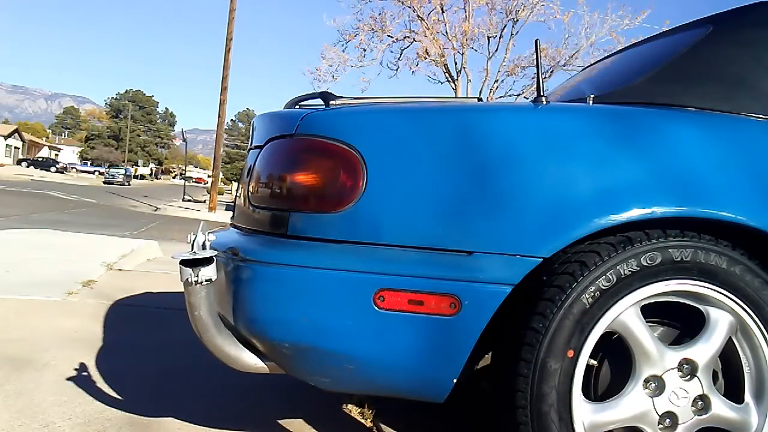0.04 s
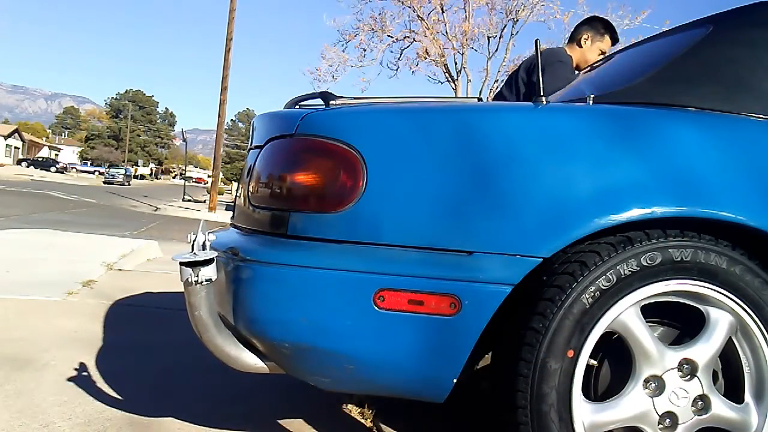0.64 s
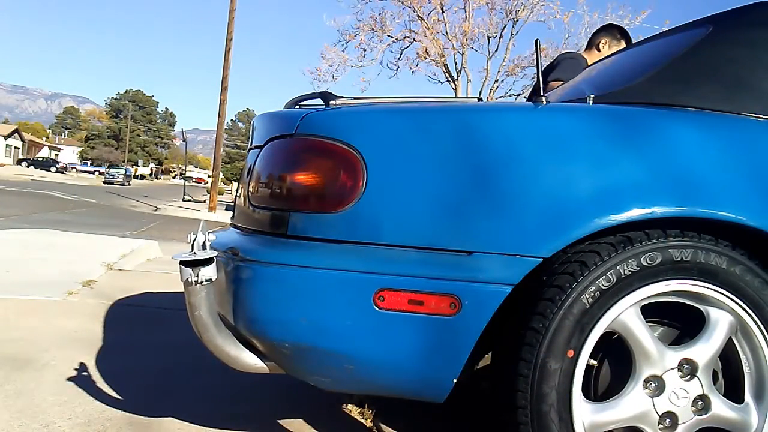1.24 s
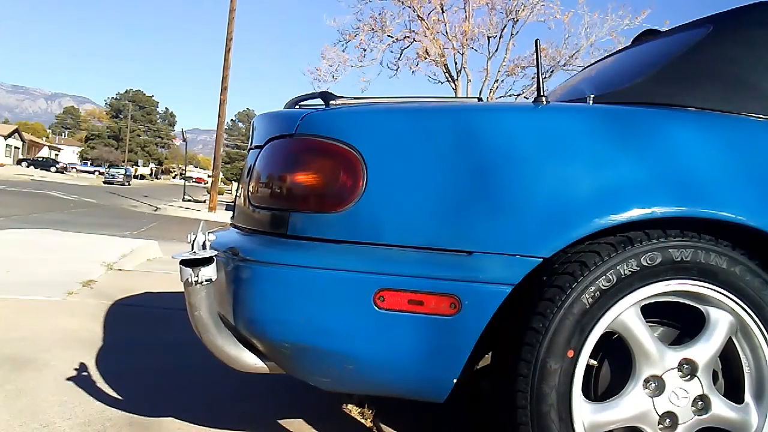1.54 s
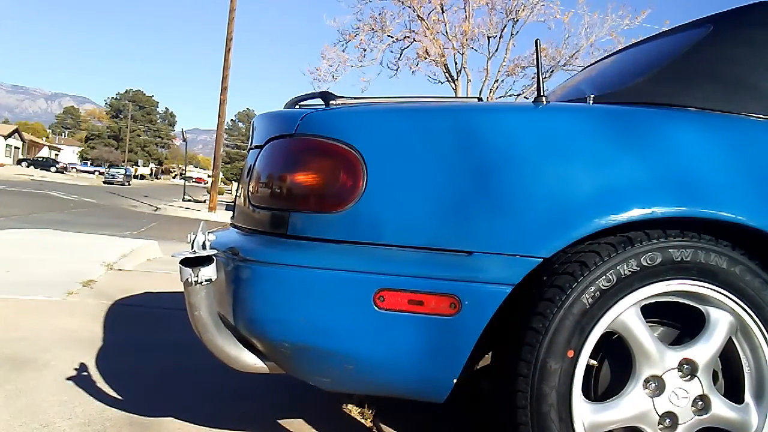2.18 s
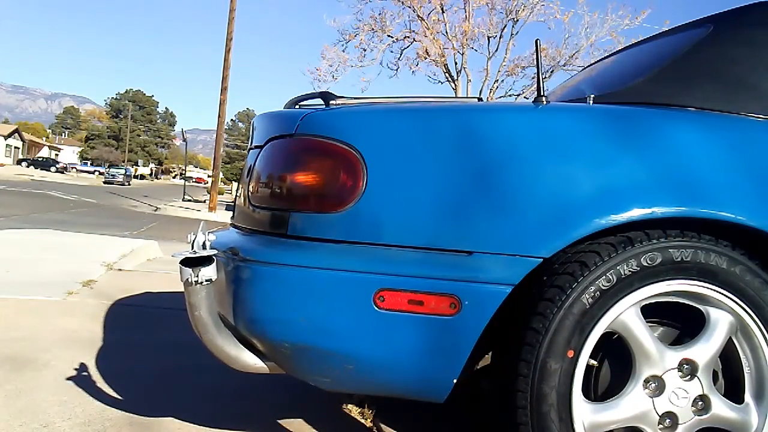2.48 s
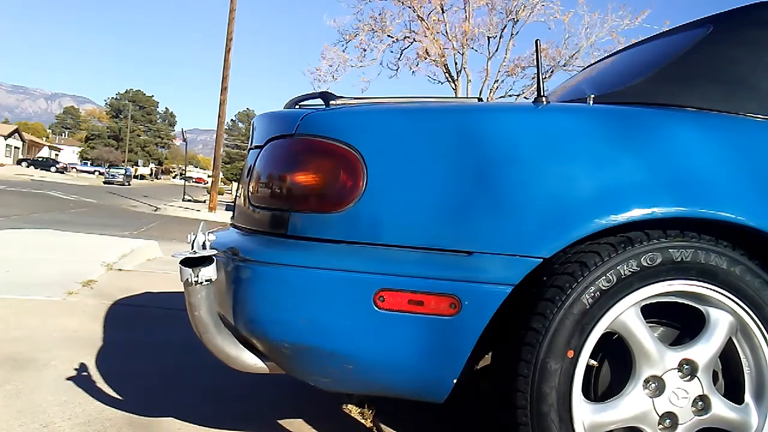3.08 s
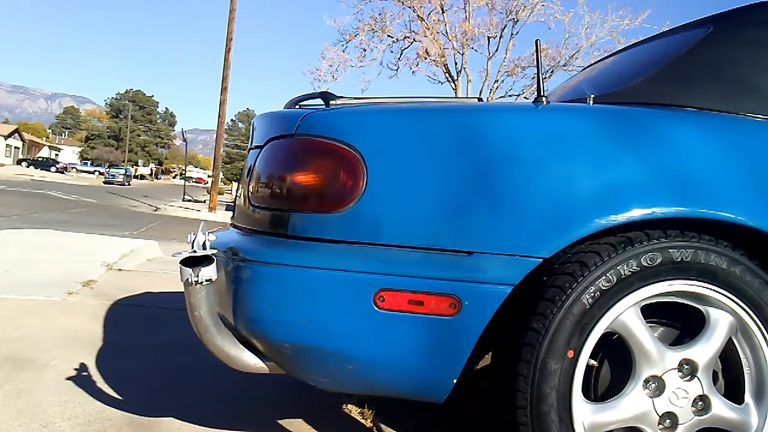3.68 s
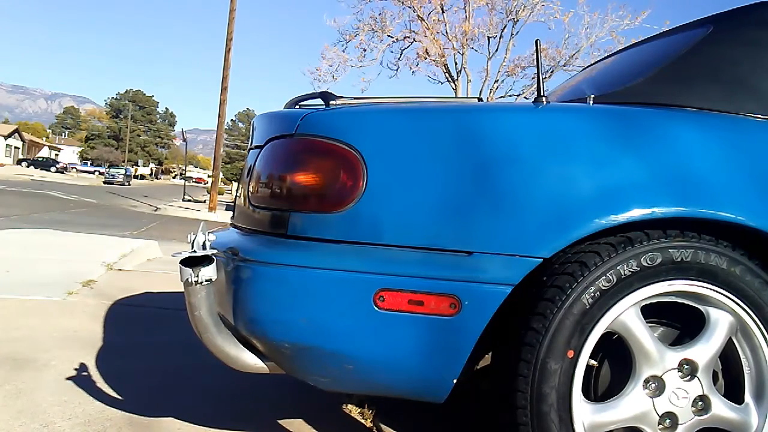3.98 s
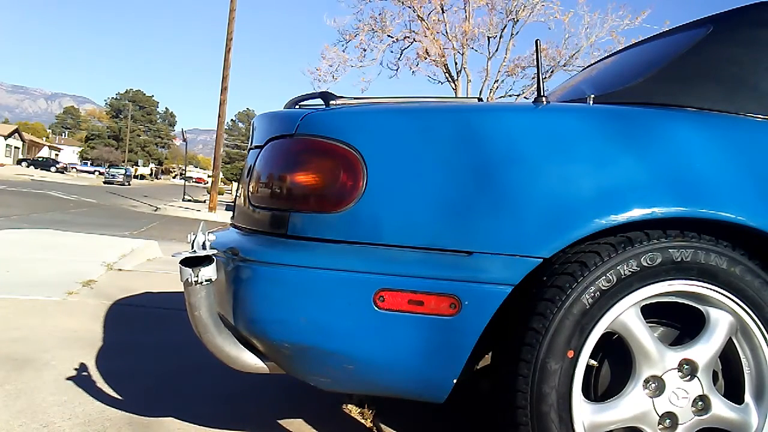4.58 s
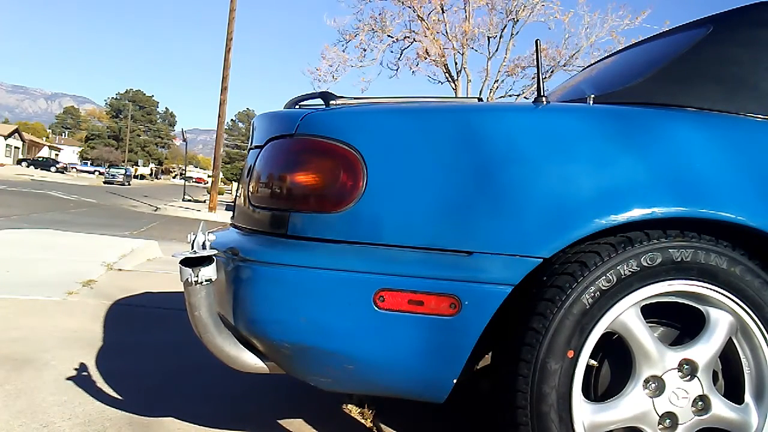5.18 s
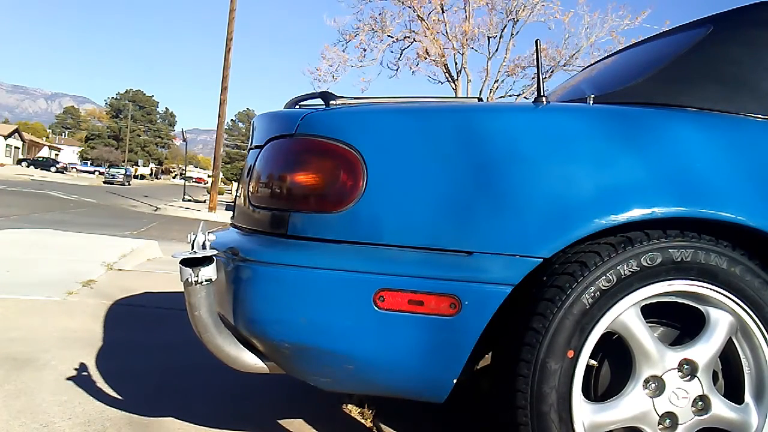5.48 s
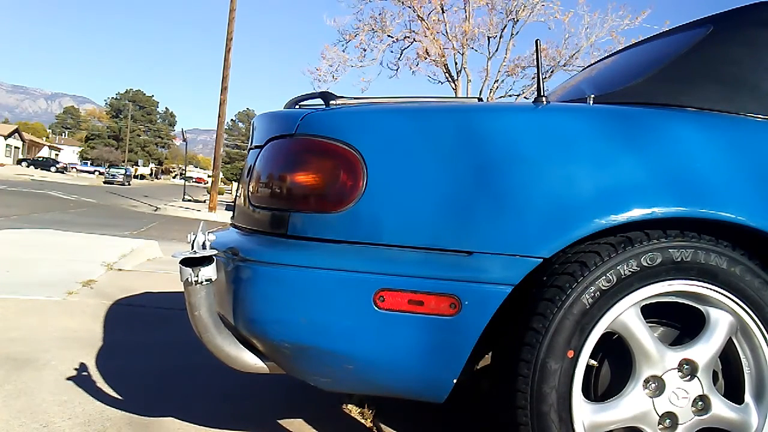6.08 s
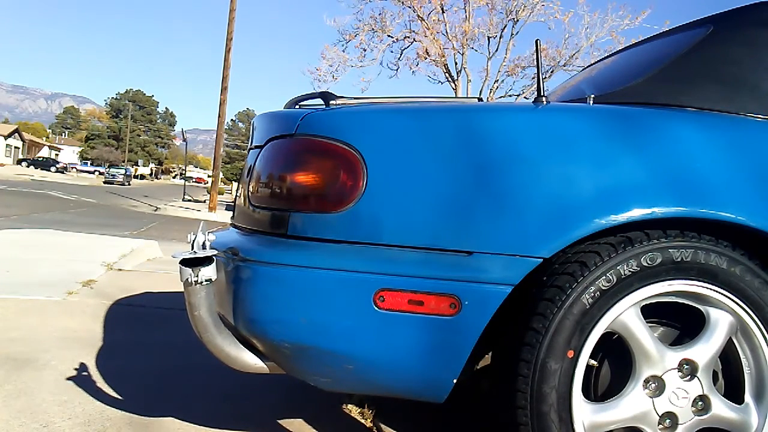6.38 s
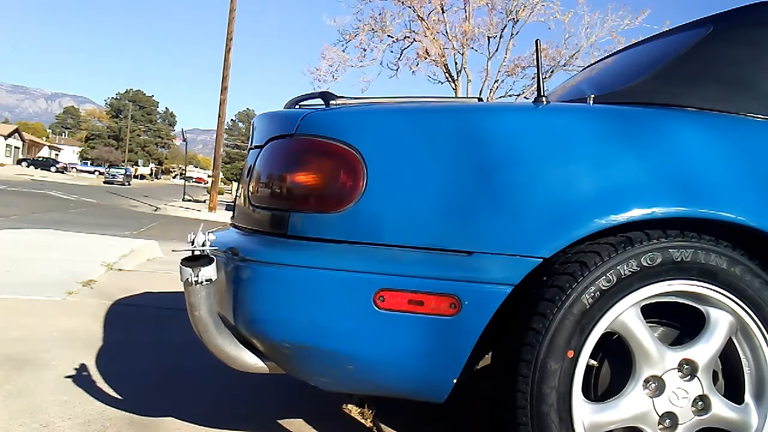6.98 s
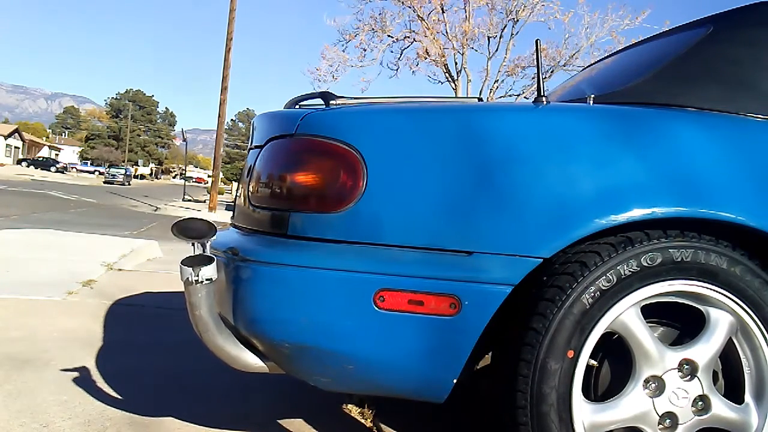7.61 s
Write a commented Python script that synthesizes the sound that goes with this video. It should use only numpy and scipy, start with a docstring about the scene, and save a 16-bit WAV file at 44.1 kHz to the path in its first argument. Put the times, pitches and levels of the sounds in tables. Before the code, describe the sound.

Close, throaty car engine idle with a door thud and light ticking, ending in three quick revs and a clanking exhaust cap.

```python
"""On a street, close by, a small four-cylinder car idles through an upturned pipe with a hinged metal cap.
Each firing sends out a pressure pulse (boom), excites standing waves (growl, puff) and sheds turbulence
(chuff, hiss). The idle settles, the driver shuts the door, the cap ticks on the rim, and the recorder
turns the sound down in steps. Then three stabs of throttle steepen the pulses into shocks that bark,
rasp and sizzle; the cap clanks between them."""
import sys
import numpy as np
from scipy import signal
from scipy.fft import rfft, irfft, next_fast_len
from scipy.io import wavfile
from scipy.ndimage import uniform_filter1d, minimum_filter1d

SR = 44100
rng = np.random.default_rng(int(sys.argv[2]) if len(sys.argv) > 2 else 0)


def materialize(psi):
    """Save the field psi as 16-bit PCM at rate SR to the path in sys.argv[1].

    A 1-D psi becomes a single channel; in a 2-D psi each row is a channel.
    """
    bounded = np.clip(np.atleast_2d(psi).T, -1, 1)
    quanta = np.round(bounded * 32767).astype(np.int16)
    wavfile.write(sys.argv[1], SR, quanta)


N = 346163
T = np.arange(N) / SR
SIZE = next_fast_len(N + SR // 2)
FREQS = np.arange(SIZE // 2 + 1) * SR / SIZE


def amp(db):
    """Amplitude ratio of a level in decibels."""
    return 10 ** (np.asarray(db) / 20)


def curve(points):
    """Linear interpolation of (t/s, value) points."""
    return np.interp(T, *np.transpose(points))


def noise():
    """Gaussian white noise."""
    return rng.standard_normal(N)


def scatter(spread_db, count, modes):
    """Log-normal excitation: for each mode, a random gain at each of count events."""
    return amp(spread_db * rng.standard_normal((count, len(modes))).T)


def shape(x, response):
    """Linear filtering: the spectrum times a frequency response."""
    return irfft(rfft(x, SIZE) * response, SIZE)[:N]


def colour(x, spectrum):
    """Spectral weighting through (f/Hz, level/dB) points."""
    hz, db = np.transpose(spectrum)
    return shape(x, amp(np.interp(np.log(FREQS + 1), np.log(hz), db)))


def ring(x, modes):
    """Modal superposition: damped resonators (f/Hz, bandwidth/Hz, gain/dB) in parallel."""
    return shape(x, sum(amp(db) * 1j * FREQS * w / (f * f - FREQS ** 2 + 1j * FREQS * w)
                        for f, w, db in modes))


def bent_ring(x, modes, scale):
    """Time warping: all resonant frequencies follow one moving factor."""
    clock = np.cumsum(scale) / SR
    grid = T * clock[-1] / T[-1]
    rung = ring(np.interp(grid, clock, x), [(f * scale.mean(), w, db) for f, w, db in modes])
    return np.interp(clock, grid, rung)


def cut(x, hz, kind, order=4):
    """Zero-phase Butterworth low- or high-pass."""
    ratio = (FREQS + 1) / hz
    return shape(x, (1 + ratio ** (2 * order if kind == "low" else -2 * order)) ** -.5)


def band(x, low_hz, high_hz, low_order=4, high_order=4):
    """Band-pass: two slopes in cascade."""
    return cut(cut(x, low_hz, "high", low_order), high_hz, "low", high_order)


def shelf(x, hz, db, order=4):
    """High shelf: the part above hz changes by db."""
    return x + (amp(db) - 1) * cut(x, hz, "high", order)


def steady(x, seconds=0.045):
    """Normalisation to unit running RMS, keeping each pulse's shape."""
    k = int(seconds * SR)
    return x / np.sqrt(np.abs(uniform_filter1d(uniform_filter1d(x * x, k), k)) + 1e-12)


def pulses(times, sizes):
    """Impulse train, each impulse shared between two samples."""
    at = np.clip(times * SR, 0, N - 2)
    i = at.astype(int)
    return np.bincount(i, sizes * (1 - at + i), N) + np.bincount(i + 1, sizes * (at - i), N)


def turbulence(kicks, rise_s, fall_s, rest, seconds=0.14):
    """Flow noise: it swells and decays after each kick, over a resting flow."""
    t = T[:SR // 10]
    flow = signal.oaconvolve(kicks, (1 - np.exp(-t / rise_s)) * np.exp(-t / fall_s))[:N]
    return (steady(flow, seconds) + rest) * noise()


# firing rate of the settling idle: t/s, f/Hz
IDLE_RATE = [(0, 53.03), (.25, 52.34), (.5, 50.1), (1, 48.52), (1.7, 47.05), (2.3, 46.55), (4, 46.56),
             (5, 47.08), (6, 47.37), (6.6, 47.15)]
# throttle stabs: opening t/s, shutting t/s, firing rate reached f/Hz, added rasp and sizzle level/dB
STABS = [(6.672, 7.031, 87.7, -1.5), (7.26, 7.457, 103.7, 0), (7.588, 7.735, 113, 1)]
def firing_rate(coast_hz_per_s=32):
    """Fundamental frequency: the idle, then a linear climb in each stab and a slow fall after it."""
    points = list(IDLE_RATE) + [(STABS[0][0], IDLE_RATE[-1][1])]
    next_opens = [row[0] for row in STABS[1:]] + [T[-1]]
    for (_, shuts, top_hz, _), until in zip(STABS, next_opens):
        points += [(shuts, top_hz), (until, top_hz - coast_hz_per_s * (until - shuts))]
    return curve(points)


def fast_idle():
    """Normalised idle speed: 1 at its fastest, 0 at its slowest."""
    hz = curve(IDLE_RATE)
    return (hz - hz.min()) / np.ptp(hz)


def stab(opens, shuts, rise_s=0.012, lag_s=0.0045, fall_s=0.018):
    """Relaxation of flow, 0-1: it builds up, holds, and decays a moment after the throttle shuts."""
    return np.clip((T - opens) / rise_s, 0, 1) * np.exp(-np.maximum(T - shuts - lag_s, 0) / fall_s)


def engine_load(first=0.47, full_s=0.21):
    """Load, 0-1: each stab catches at part load and builds towards a clean burn."""
    loads = (stab(opens, shuts) * np.interp(T - opens, [0, full_s], [first, 1])
             for opens, shuts, *_ in STABS)
    return np.clip(sum(loads), 0, 1)


# cylinders in firing order: delay/cycles, push level/dB, gas level/dB
CYLINDERS = [(0.031, 3, 2.5), (-0.012, 4.5, 3.5), (0.02, 2, 2.5), (-0.017, 2.5, 4.5)]
def firings(load, idle_jitter=0.0065, overrun_jitter=0.045, lope=1.4, settle_s=.5):
    """Cyclic variation: time, push and gas of each firing scatter, most when unloaded at speed."""
    hz = firing_rate()
    cycles = np.cumsum(hz) / SR + .65
    count = np.arange(1, int(cycles[-1]) + 1)
    late, push_db, gas_db = np.array(CYLINDERS)[count % 4].T
    timing, strength, burn = rng.standard_normal((len(count), 3)).T
    overrun = np.interp(count, cycles, (1 - load) * np.clip((hz - 78) / 22, 0, 1))
    uneven = 1 - 0.88 * np.interp(count, cycles, load)  # load evens out the cylinders
    late = late * (1 + lope * np.exp(-np.interp(count, cycles, T) / settle_s))
    jitter = idle_jitter * uneven + overrun_jitter * overrun
    times = np.interp(count + uneven * late + jitter * timing, cycles, T)
    push = amp(uneven * push_db + (2.5 + 3 * overrun) * strength)
    return times, push, amp(uneven * gas_db + 2 * burn)


# standing waves of the whole exhaust: f/Hz, bandwidth/Hz, gain/dB
GROWL_MODES = [(140.56, 13.9, 11), (189.8, 21.7, -1.5), (211.7, 18.2, 2), (239.6, 5.8, 0), (259.2, 7.9, -8)]
def exhaust_note(times, push, load, boom_db, growl_db, overtone_db, lag_cycles=0.15):
    """Forced oscillation: each firing pushes out a swell of pressure and drives the standing waves."""
    edges = np.r_[times[0] - .02, times, times[-1] + .01]
    angle = 2 * np.pi * np.interp(T, edges, np.arange(len(edges)))
    second = amp(-10) * (47 / firing_rate()) ** 3  # the swell rounds off as firings crowd together
    swell = np.cos(angle - 2 * np.pi * lag_cycles) + second * np.cos(2 * angle)
    boom = cut(np.interp(T, times, push) * swell, 43, "high", order=8)
    kicks = pulses(times, push)
    swirl = 0.27 * (1 - .7 * load) * turbulence(kicks, 0.00033, 0.014, 0.62)
    growl = band(ring(steady(kicks) + swirl, GROWL_MODES), 140.8, 259.7, 4, 9)
    growl = shelf(growl, 207, overtone_db, order=6)
    return steady(boom) * amp(boom_db) + steady(growl) * amp(growl_db)


GAIN_STEP_S, THROB_FROM_S, REV_START_S = .04, 4.98, 6.674
# settled idle, and what the fast idle adds: level/dB of boom, growl, puff, chuff, hiss
IDLE_DB, FAST_IDLE_DB = (-15.5, -16.5, -31.5, -35.5, -54.5), (-0.49, -1.1, 0.97, 1.3, 0.7)
# gain steps of the recorder's noise reducer: t/s, change of level/dB in the same five bands
RECORDER_GAIN_STEPS = [(2.96, 0, -0.94, -0.4, -3.5, -5), (3.94, -2, -1.2, -1.3, -3.5, 0.8),
                       (4.95, -3.5, -4.5, -1.1, -1.66, -1), (5.95, -0.5, -0.8, -1.2, -0.95, -1.5)]
# brief swells of hiss: t/s, half-width/s, added level/dB
HISS_SWELLS = [(0.02, 0.077, 9), (0.31, .05, 7.5)]
def idle_levels(throb_hz=5.37, throb_db=2.8):
    """Gain reduction: the sound drops once a second, band by band, as the recorder turns it down."""
    db = np.array(IDLE_DB)[:, None] + np.outer(FAST_IDLE_DB, fast_idle())
    for s, *change_db in RECORDER_GAIN_STEPS:
        db = db + np.outer(change_db, np.clip((T - s) / GAIN_STEP_S + .5, 0, 1))
    boom, growl, puff, chuff, hiss = db
    throb = -throb_db * np.sin(2 * np.pi * throb_hz * np.maximum(T - THROB_FROM_S, 0))
    swells = sum(swell_db * np.exp(-((T - s) / width) ** 2) for s, width, swell_db in HISS_SWELLS)
    return boom + throb, growl, puff, chuff, hiss + swells


# tailpipe resonances at idle: f/Hz, bandwidth/Hz, gain/dB
PUFF_MODES = [(390.3, 84, -3.5), (485.3, 69, -2), (551, 23.6, 7.5), (648, 450, -7.5), (630, 47, -4.5),
              (933.5, 32.4, 7.5)]
# spectra of low and high gas noise: f/Hz, level/dB
CHUFF_SPECTRUM = [(300, 5.5), (800, 1), (1400, 0), (2400, -3.5), (3200, -14), (4300, -18), (6000, -20.5),
                  (8000, -28), (15000, -39)]
HISS_SPECTRUM = [(2000, -15.5), (5000, 3.5), (7400, 0.5), (9500, 4), (11000, 0.5), (13000, -6),
                 (15500, -13)]
def idle_gas(times, push, gas, puff_db, chuff_db, hiss_db, round_trip_s=0.00686):
    """Reflection in a pipe: each puff leaves twice, directly and after a round trip."""
    kicks = pulses(times, gas) + pulses(times + round_trip_s, gas)
    beats = steady(pulses(times, push * gas) + pulses(times + round_trip_s, push))
    drive = beats + .5 * turbulence(kicks, .0005, .005, .7)
    burble = scatter(2.2, len(times), PUFF_MODES)
    puff = sum(ring(drive * np.interp(T, times, size), [mode]) for mode, size in zip(PUFF_MODES, burble))
    puff = shelf(band(puff, 288, 840, 3, 6), 670, 5 * fast_idle())  # brighter at the fast idle
    chuff = colour(turbulence(kicks, 0.0016, 0.0056, 1.0) + 0.033 * beats, CHUFF_SPECTRUM)
    hiss = colour(turbulence(kicks, 0.0006, 0.0058, 0.96), HISS_SPECTRUM)
    return (steady(puff, 1.0) * amp(puff_db) + steady(chuff, 0.057) * amp(chuff_db + 4.5)
            + steady(hiss, .15) * amp(hiss_db + 1.0))


# modes of the lightly touched cap: f/Hz, bandwidth/Hz, gain/dB
CHATTER_MODES = [(2710, 350, 2), (3333, 75, 1.5), (3600, 170, -1.5), (4190, 350, 0), (5450, 69, -0.5)]
def cap_chatter(times, gas, level_db, lag_s=0.0016):
    """Contact excitation: strong firings rattle the cap, each touch favouring other modes."""
    touches = np.minimum(gas, 1.35) ** 3 * scatter(3, len(times), CHATTER_MODES)
    chatter = sum(ring(turbulence(pulses(times + lag_s, touch), 0.00037, 0.008, 0.08, 1.0), [mode])
                  for mode, touch in zip(CHATTER_MODES, touches))
    return steady(band(chatter, 1500, 4700), 0.21) * amp(level_db)


# blows of the cap on the rim: t/s, relative level/dB, crack level/dB re the blow
CLANKS = [(0.039, -31.5, -21), (0.079, -27.5, -24), (6.648, -24.5, -17), (7.18, -25, -25),
          (7.186, -17, -18), (7.263, -19, -23), (7.53, -22, -11.5), (7.775, -24, -10.5)]
# modes of the struck cap: f/Hz, bandwidth/Hz, gain/dB
CAP_MODES = [(1610, 8.2, 18), (1780, 14, 16.5), (2630, 130, -0.5), (3120, 78, -4), (3980, 49, 4.5),
             (3980, 6.7, -20), (5350, 110, -3.5), (6050, 28, -5), (7876, 19, -6), (7960, 41, -14),
             (9700, 31, -18)]
def cap_clanks(rattle_s=0.014, clack_db=-10):
    """Free vibration after impact: the cap slaps the rim with a short rattle and rings."""
    blows, cracks = np.zeros(N), np.zeros(N)
    for s, db, crack_db in CLANKS:
        blow = amp(db) * np.exp(-np.abs(T - s) / rattle_s) * (T >= s) * noise()
        blows += blow
        cracks += amp(crack_db) * blow
    ringing = cut(ring(blows, CAP_MODES), 11000, "low", order=3)
    clack = amp(clack_db) * ring(blows, CHATTER_MODES)
    return amp(10) * (ringing + colour(cracks, HISS_SPECTRUM) + clack)


# spectrum of the door panel: f/Hz, level/dB
PANEL_SPECTRUM = [(100, -23), (300, 6), (780, -7), (1300, -11), (1800, -19), (4000, -31), (15000, -52)]
def door(shut_s=1.782, panel_s=0.054, latch_s=0.039, thump_hz=80, thump_s=0.053):
    """Damped transients: the latch snaps, the panel clatters, and the cabin air thumps a moment later."""
    age = np.maximum(T - shut_s, 0)
    onset = 1 - np.exp(-age / 0.00038)
    panel = steady(colour(noise(), PANEL_SPECTRUM)) * amp(-17) * np.exp(-age / panel_s)
    snap = cut(colour(noise(), HISS_SPECTRUM), 8600, "low", order=3)
    latch = steady(snap) * amp(-37) * np.exp(-age / latch_s)
    swell = (age / thump_s) ** 2 * np.exp(2 - 2 * age / thump_s)
    return onset * (panel + latch) + amp(-12) * swell * np.sin(2 * np.pi * thump_hz * age)


# hardest ticks of the cap at idle: t/s, relative level/dB
TICKS = [(2.35, -24), (2.7366, -29), (2.7805, -25), (3.0364, -36), (3.467, -25), (3.5518, -32),
         (3.8965, -28), (3.9824, -29.5), (4.154, -28.5), (4.2407, -30), (4.6662, -31), (5.1367, -30),
         (5.175, -28.5), (6.0461, -33)]
def cap_ticks(ring_s=.005):
    """Modal decay: lifted higher by a puff now and then, the cap drops on the rim and rings briefly."""
    times, db = np.transpose(TICKS)
    sizes = amp(db - 7) * scatter(3, len(times), CHATTER_MODES)
    decay = np.exp(-T[:SR // 10] / ring_s)
    ticks = np.zeros(N)
    for mode, size in zip(CHATTER_MODES, sizes):
        envelope = signal.oaconvolve(pulses(times, size), decay)[:N]
        ticks += envelope * steady(ring(noise(), [mode])) * amp(mode[2])
    return band(ticks, 2000, 5100) / np.sqrt(len(CHATTER_MODES))


# the pipe under load: firing rate f/Hz, level/dB of boom, growl, bark, rasp, sizzle
LOADED_LEVELS = [(47.3, -14.5, -16, -16, -22, -28), (58, -9, -14.5, -19.5, -22, -35),
                 (79.2, -10.5, -18, -16, -19.5, -37.5), (90.4, -16.5, -26, -14.5, -12.5, -25.5),
                 (100, -19, -18, -13, -13, -24.5), (113, -18, -17.5, -13, -13.5, -24)]
# the same five off throttle: change of level/dB, then drift/(dB/s)
OVERRUN_DB, COAST_DB_PER_S = (6.5, 1.5, -5.5, -8.5, -13), (-42, 3, 20, -6, -6)
def rev_levels():
    """Spectral balance: speed and load favour the rasp; shutting the throttle briefly restores the boom."""
    rates, *columns = np.transpose(LOADED_LEVELS)
    hz = firing_rate()
    throttle, coast_s, edge = np.zeros((3, N))
    for opens, shuts, _, edge_db in STABS:
        flow = stab(opens, shuts)
        throttle += flow
        edge += edge_db * flow
        coast_s = np.where(T > shuts, T - shuts, coast_s)
    shut = (1 - np.clip(throttle, 0, 1)) * (coast_s > 0)
    boom, growl, bark, rasp, sizzle = (np.interp(hz, rates, loaded) + shut * (drop + drift * coast_s)
                                       for loaded, drop, drift in zip(columns, OVERRUN_DB, COAST_DB_PER_S))
    return boom, growl, bark, rasp + edge, sizzle + edge


# low tailpipe resonances under load: f/Hz, bandwidth/Hz, gain/dB
BARK_MODES = [(254, 24, 2), (370, 120, -12.5), (520, 240, -5.5), (692, 58, 7.5), (860, 110, -5),
              (952, 24, 2.5)]
def pipe_bark(shocks, kicks, rough):
    """Air-column resonance: shocks and swirling gas ring the tailpipe's low modes."""
    swirl = rough * turbulence(kicks, .001, .007, .45)
    return steady(band(ring(shocks + swirl, BARK_MODES), 220, 1050, 4, 5))


# upper tailpipe resonances: f/Hz, bandwidth/Hz, gain/dB
RASP_MODES = [(1513, 73, 10.5), (1690, 24, -7), (1900, 32, -5.5), (2205, 58, -1), (3110, 94, -9),
              (3355, 50, -8.5), (4350, 72, -6)]
def pipe_rasp(shocks, kicks, rough, hz, load, sag_per_hz=0.0019, steepen_db_per_hz=0.9):
    """Convection: faster flow lowers the modes that the shocks ring; off load the gas burbles."""
    crack = rough * turbulence(kicks, .0005, .0025, .1)
    sag = 1 - sag_per_hz * (np.maximum(hz, 78) - 100)
    rasp = band(bent_ring(shocks + crack, RASP_MODES, sag), 1440, 3260, 5, 5)
    rasp = shelf(rasp, 1490, steepen_db_per_hz * (hz - 92.5))  # faster firings make steeper shocks
    burble = colour(turbulence(kicks, 0.0047, 0.048, 0.94), CHUFF_SPECTRUM)
    return steady(rasp) * (.55 + .55 * load) + steady(burble) * (.8 - .7 * load)


# treble resonances driven by the jet: f/Hz, bandwidth/Hz, gain/dB
SIZZLE_MODES = [(4490, 330, 12), (5120, 190, 4.5), (5590, 180, 7.5), (6280, 360, 0.5), (7500, 1100, -0.5),
                (8700, 150, 4), (9530, 300, 0), (10540, 190, 2.5), (12500, 900, -37)]
def jet_sizzle(times, kicks, hz, load, brighten_db_per_hz=0.24):
    """Jet noise: each burst favours other treble resonances, and the sound brightens with speed."""
    jet = turbulence(kicks, 0.00075, 0.0039, .45 - 0.25 * load)
    sizes = scatter(3, len(times), SIZZLE_MODES)
    sizzle = sum(ring(jet * np.interp(T, times, size), [mode]) for mode, size in zip(SIZZLE_MODES, sizes))
    return steady(shelf(band(sizzle, 2200, 14000, 3, 4), 5400, brighten_db_per_hz * (hz - 96)))


def revving(times, push, gas, load, bark_db, rasp_db, sizzle_db, shock_lag_s=.008):
    """Nonlinear steepening: under load the pulses become shocks that bark, rasp and sizzle."""
    hz = firing_rate()
    slow = np.interp(np.interp(times, T, hz), [58, 77], [1, 0])
    times = times + shock_lag_s * slow  # at low speed the shock trails the swell of pressure
    kicks = pulses(times, push * gas)
    shocks = steady(pulses(times, push * np.sqrt(gas))) * load
    rough = .7 - .53 * load  # share of turbulence, least at full load
    bark = pipe_bark(shocks, kicks, rough) * amp(bark_db)
    rasp = pipe_rasp(shocks, kicks, rough, hz, load) * amp(rasp_db)
    sizzle = jet_sizzle(times, kicks, hz, load) * amp(sizzle_db - 2)
    return (bark + rasp + sizzle) * np.clip((T - REV_START_S) / 0.027, 0, 1)


def scene(take_up_s=.08):
    """Superposition: one train of firings drives the pipe; clanks, ticks and the door add to it."""
    load = engine_load()
    times, push, gas = firings(load)
    idle_boom, idle_growl, puff_db, chuff_db, hiss_db = idle_levels()
    rev_boom, rev_growl, *rev_db = rev_levels()
    revved = np.clip((T - STABS[0][0]) / take_up_s + 1, 0, 1)  # the low note swells before the first stab
    late_idle = np.clip((T - THROB_FROM_S) / GAIN_STEP_S, 0, 1) * (1 - revved)
    boom_db = idle_boom + revved * (rev_boom - idle_boom)
    growl_db = idle_growl + revved * (rev_growl - idle_growl)
    overtone_db = 6.5 * fast_idle() + 2 * late_idle + 8 * revved
    note = exhaust_note(times, push, load, boom_db, growl_db, overtone_db)
    idle = idle_gas(times, push, gas, puff_db, chuff_db, hiss_db) + cap_chatter(times, gas, chuff_db - 9)
    idle *= np.clip((REV_START_S + 0.33 - T) / 0.075, 0, 1)  # gives way during the first stab
    revs = revving(times, push, gas, load, *rev_db)
    return (note + idle + revs + cap_clanks() + cap_ticks() + door())[None]


def record(dry, notch_hz=8320, ceiling_db=-0.6, limiter_s=0.00079, top_hz=15450):
    """Filtering and limiting: the microphone has a shallow notch; peaks are held and the top is cut."""
    x = dry[0] - 0.21 * ring(dry[0], [(notch_hz, 260, 0)])
    k = int(limiter_s * SR)
    gain = np.minimum(1, amp(ceiling_db) / (np.abs(x) + 1e-9))
    held = minimum_filter1d(gain, 2 * k)
    x = x * uniform_filter1d(uniform_filter1d(held, k), k)
    return signal.sosfilt(signal.ellip(8, .2, 70, top_hz, fs=SR, output="sos"), x)[None]


dry = scene()
out = record(dry)
materialize(out)
```